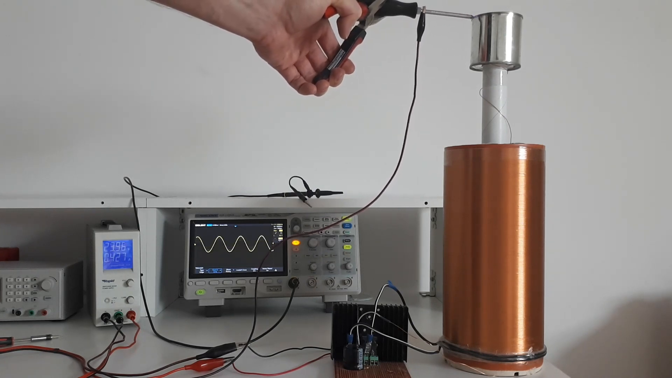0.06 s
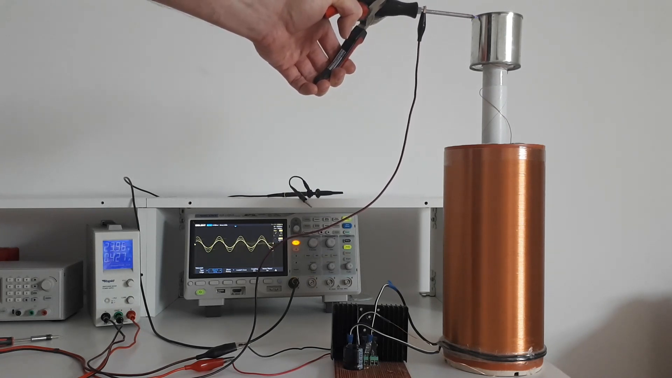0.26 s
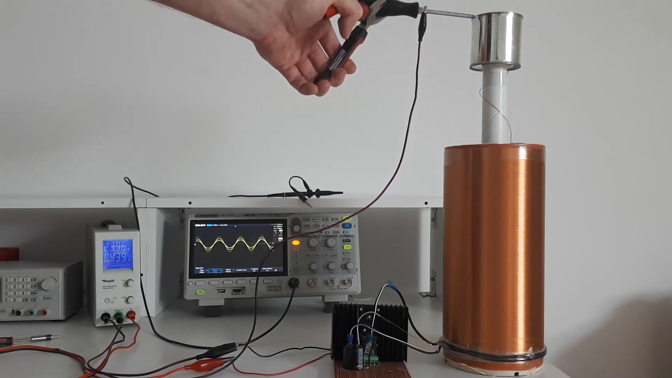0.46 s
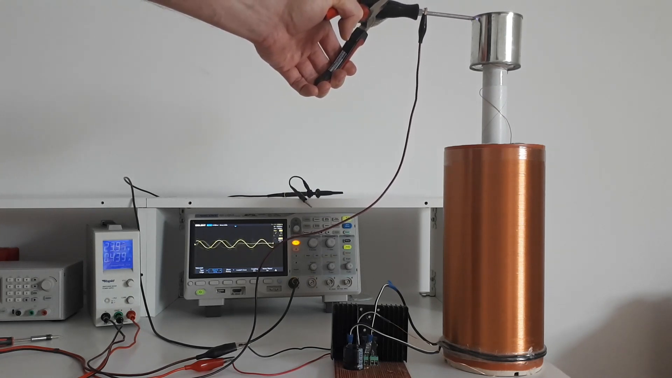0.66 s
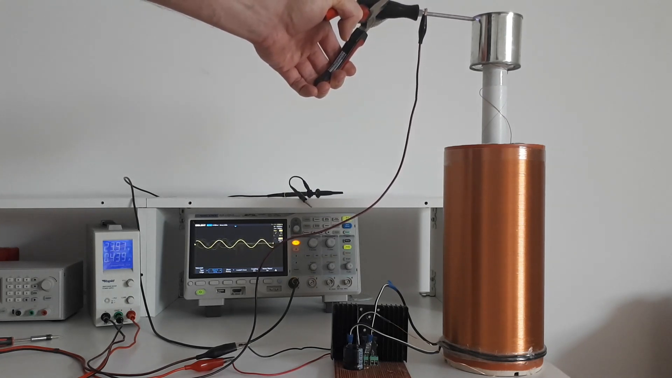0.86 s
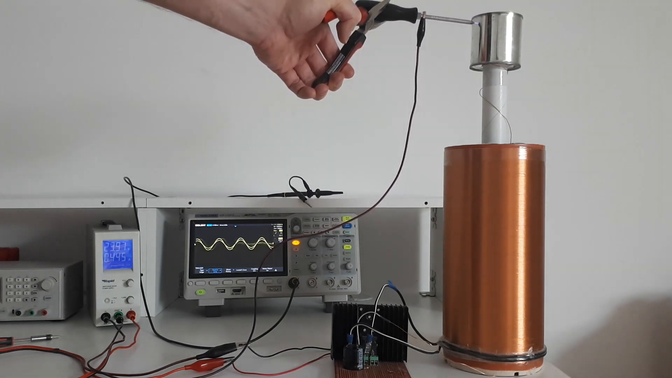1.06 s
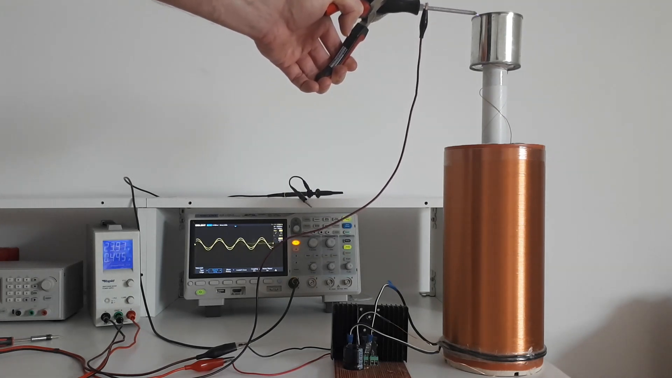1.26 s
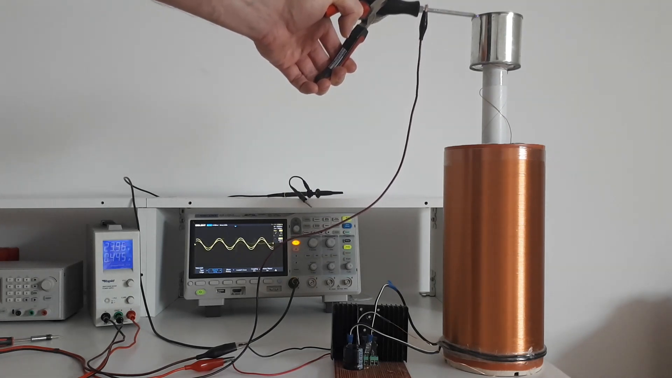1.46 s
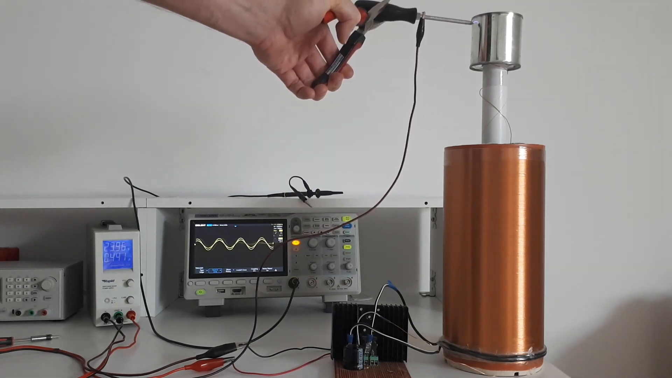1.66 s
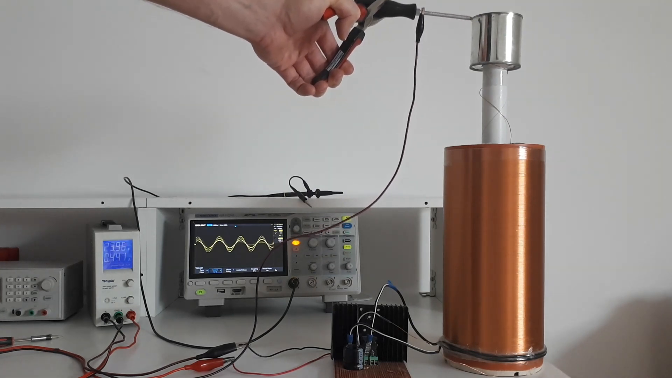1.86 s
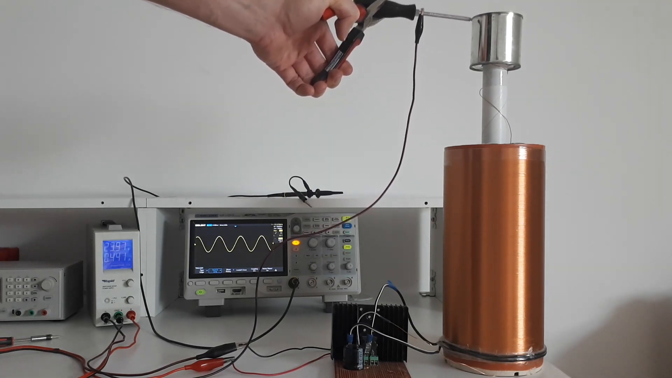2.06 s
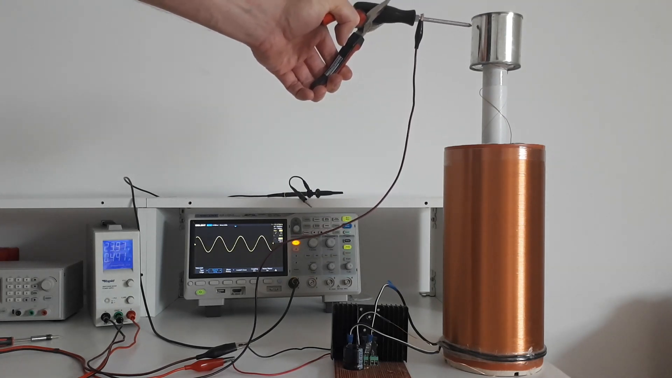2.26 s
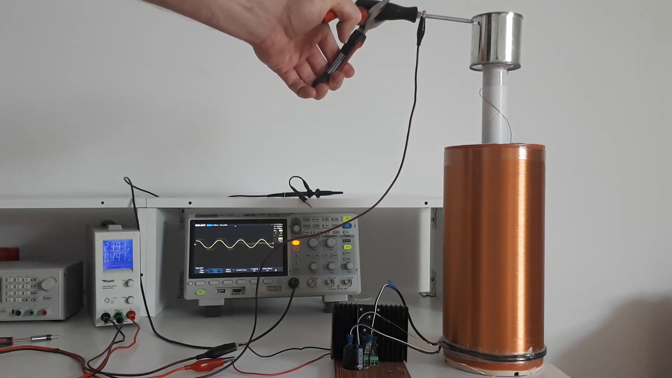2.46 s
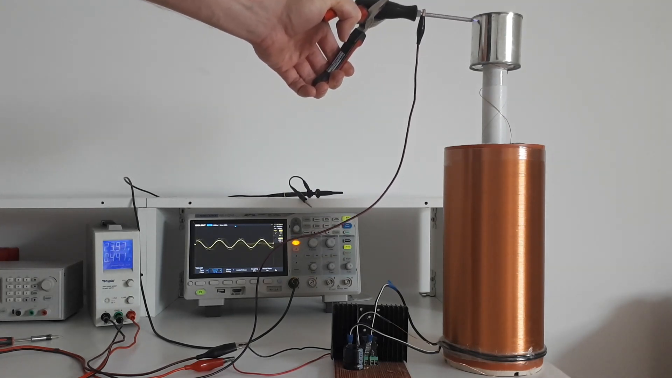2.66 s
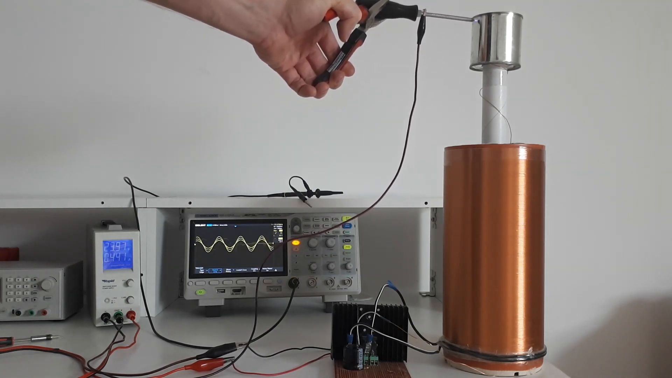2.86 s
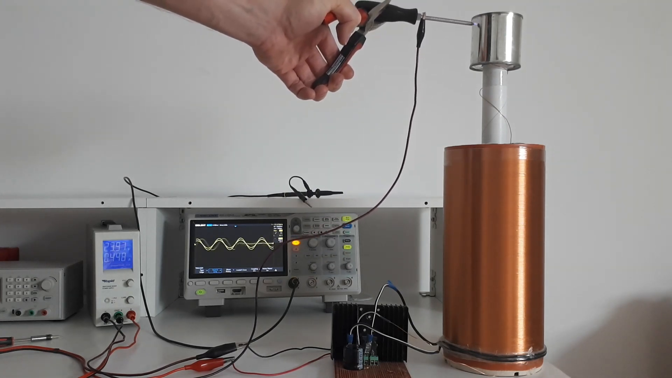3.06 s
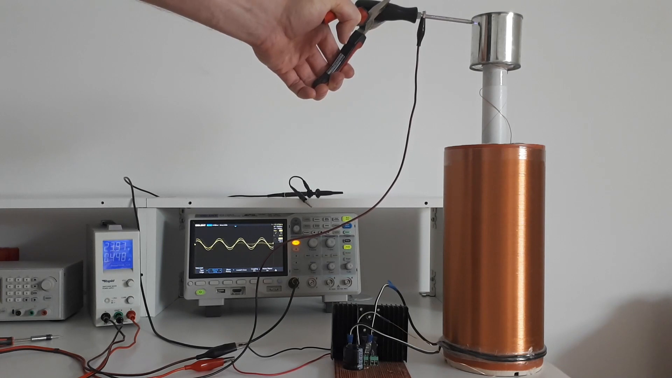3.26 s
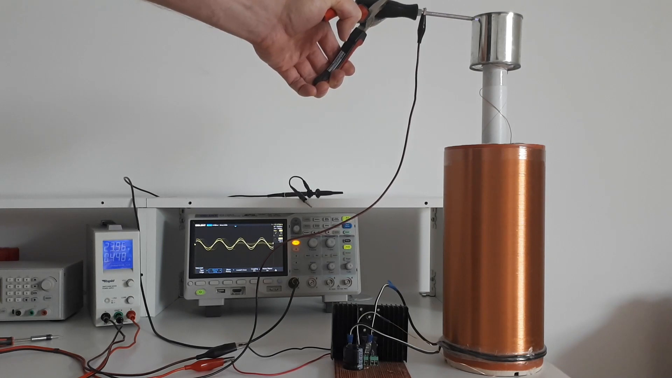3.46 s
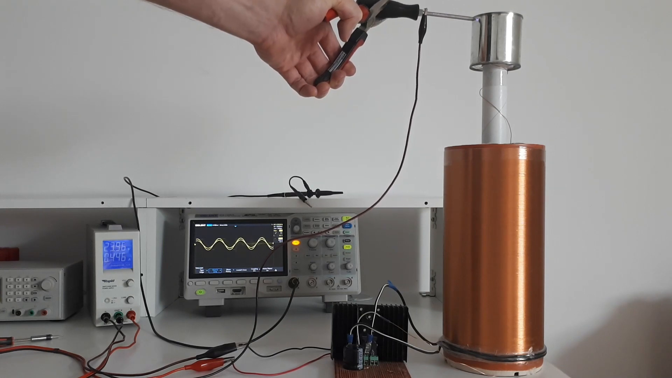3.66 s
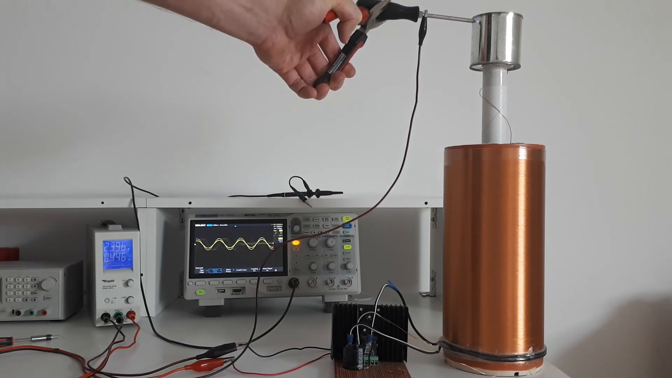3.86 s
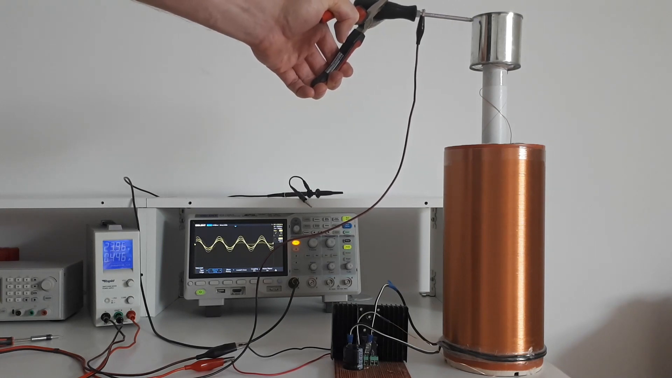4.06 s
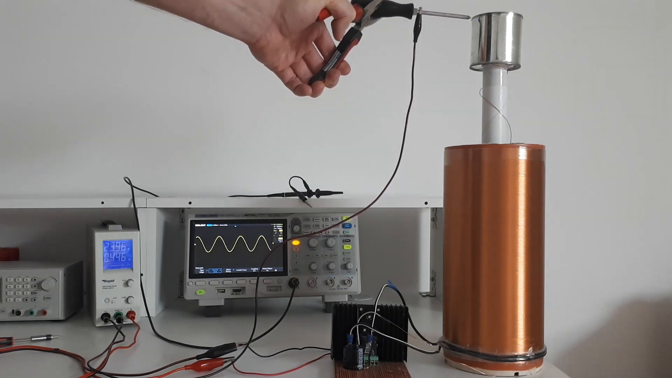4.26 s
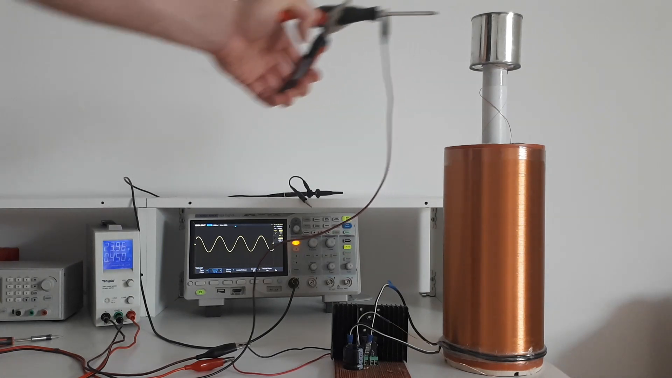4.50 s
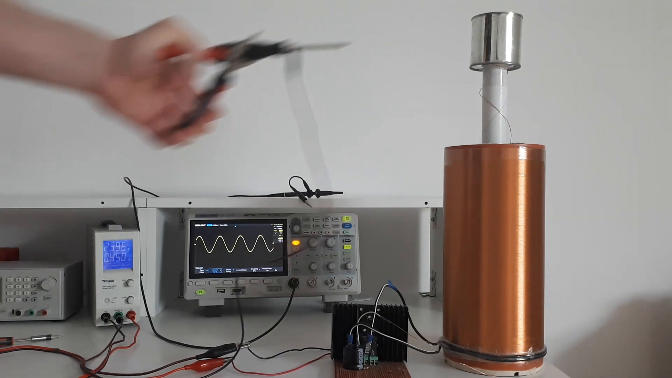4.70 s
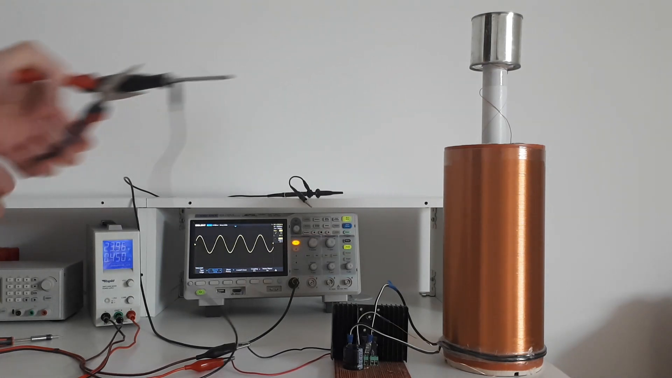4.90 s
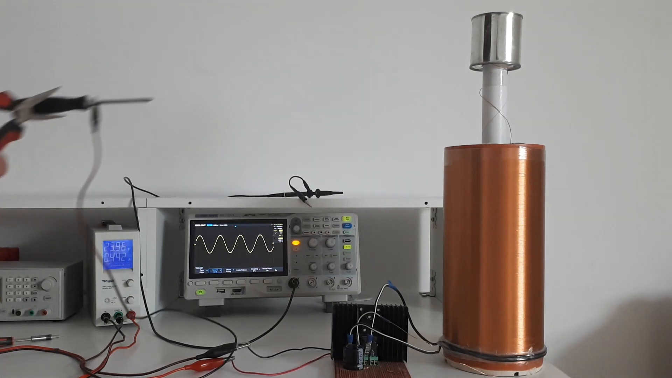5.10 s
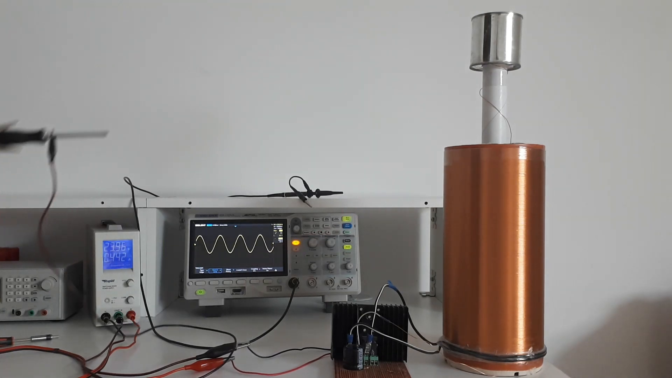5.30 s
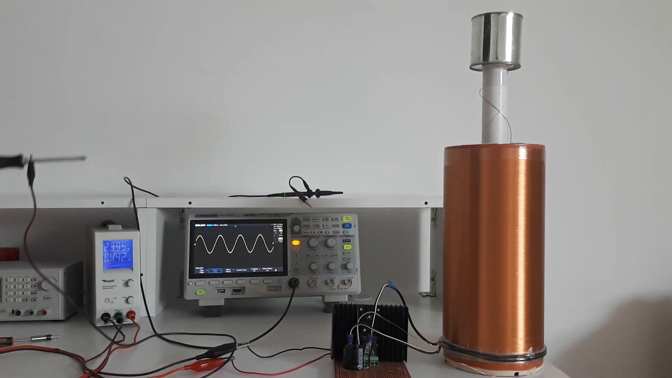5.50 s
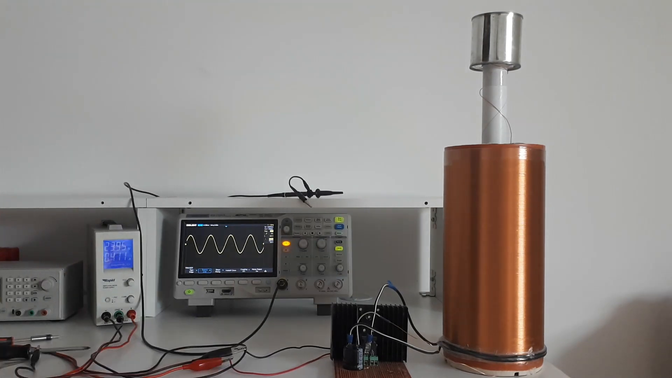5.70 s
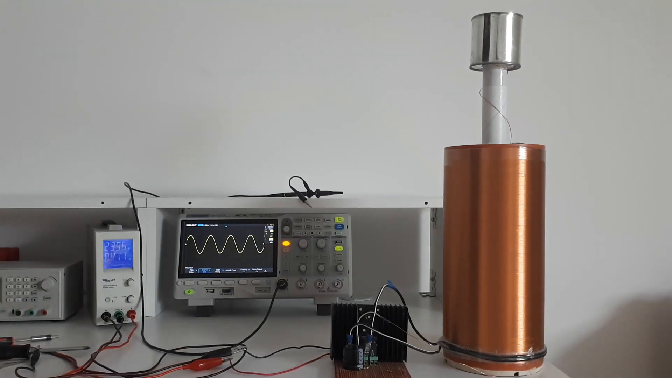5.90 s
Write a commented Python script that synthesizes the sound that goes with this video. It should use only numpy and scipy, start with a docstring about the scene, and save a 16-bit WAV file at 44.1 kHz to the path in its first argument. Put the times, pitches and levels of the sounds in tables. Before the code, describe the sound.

Harsh, high-pitched electric sizzling from a small coil bursts on and off twice over a faint fan hum in a bare room.

```python
"""Sizzling sparks from a small coil

A hand holds a grounded screwdriver near the metal top of a small high-voltage coil in a bare room.
Thousands of random kicks a second merge into a sizzle: a faint hiss, a stray spark, then two long arcs.
Fatter single sparks snap through it; echoes and decaying noise make the room around them.
Fan tones and shaped noise hum on the bench, low drones come and go, a narrow supply hiss sits on the left.
The ground lead ticks, with short fading sines, as it is pulled away."""
import sys
import numpy as np
from scipy import signal
from scipy.fft import rfft, irfft, next_fast_len
from scipy.io import wavfile
from scipy.ndimage import uniform_filter1d, map_coordinates

SR = 44100
rng = np.random.default_rng(int(sys.argv[2]) if len(sys.argv) > 2 else 0)


def log_audio(samples):
    """Write samples as a 16-bit WAV file to the path given in sys.argv[1]."""
    # one column per channel
    frames = np.atleast_2d(samples).T
    # limit to full scale, then quantise
    limited = np.clip(frames, -1, 1)
    pcm = np.round(limited * 32767).astype(np.int16)
    wavfile.write(sys.argv[1], SR, pcm)


N = 261954
TIME = np.arange(N) / SR  # seconds
LEFT_RIGHT = np.array([[1], [-1]])  # opposite signs for the two channels


def amp(db):
    """Decibels to gain."""
    return 10 ** (np.asarray(db) / 20)


def unit(x):
    """Scaled to rms 1."""
    return x / np.sqrt(np.mean(x ** 2) + 1e-20)


def along(points, hz):
    """Values read between (Hz, value) points on a log frequency axis."""
    f, v = np.transpose(points)
    return np.interp(np.log(hz + 1), np.log(f + 1), v)


def wobble(rate):
    """A smooth random curve around zero, with rate knots a second."""
    knots = rng.standard_normal(int(N * rate / SR) + 4)
    return map_coordinates(knots, [np.arange(N) * rate / SR])


def filtered(x, response):
    """x with its spectrum multiplied by a response that depends on frequency."""
    size = next_fast_len(N + SR // 2)
    spectrum = rfft(x, size) * response(np.fft.rfftfreq(size, 1 / SR))
    return irfft(spectrum, size)[..., :N]


def sides(db):
    """Left and right gains for a left minus right level difference."""
    return amp(np.array([db / 2, -db / 2]))


def phase(hz, waver):
    """The running phase of a tone whose pitch drifts randomly by about waver Hz."""
    return 2 * np.pi * (np.cumsum(hz + waver * wobble(8)) / SR + rng.random())


def thinned(start_s=5.65, fade_s=0.064):
    """0 before the hum turns thinner and brighter, 1 after."""
    return np.clip((TIME - start_s) / fade_s, 0, 1)


def drones(throb_hz=159, lift_db=2.5):
    """Soft low sines of unsteady pitch and level, the same left and right."""
    # low drones that come and go, perhaps from outside: start_s, pitch_hz, level_db (before the lift)
    drone_rows = [
        [(0, 100.8, -70), (.4, 108.1, -71), (.9, 120.5, -75), (1.5, 135, -71), (1.7, 135.8, -89)],
        [(3.6, 86.3, -98), (3.8, 87.4, -81), (4.9, 90, -75.5), (5.4, 90, -92)],
    ]
    # a wavering low tone: start_s, level_db (before the lift)
    throb_rows = [(0.0, -88), (0.06, -72), (0.2, -90), (0.61, -75), (0.76, -78), (1.04, -70), (2.68, -80.5),
                  (3.34, -70.5), (3.39, -82), (4.66, -69), (4.71, -81.5), (5.44, -66.5), (5.54, -78),
                  (5.94, -84.5)]
    out = np.zeros(N)
    for rows in drone_rows + [[(s, throb_hz, db) for s, db in throb_rows]]:
        s, hz, db = np.transpose(rows)
        level_db = np.interp(TIME, s, db, left=-120, right=-120) + lift_db + 1.9 * wobble(3.0)
        pitch_hz = np.interp(TIME, s, hz)
        out += amp(level_db) * np.sin(phase(pitch_hz, waver=1.56))
    return out


def supply_hiss(db=-81, centre_hz=7500, width_hz=420, pan_db=16):
    """The supply's narrow band of noise, stronger on the left."""
    noise = rng.standard_normal(N)
    band = filtered(noise, lambda hz: np.exp(-((hz - centre_hz) / width_hz) ** 2))
    return amp(db) * sides(pan_db)[:, None] * unit(band)


def fan_air(db=-58):
    """Moving air as shaped noise, more alike left and right in the bass, unrelated in the treble."""
    # colour of fan air and microphone hiss: pitch_hz, relative level_db (per Hz)
    air_colour = [(15, -62), (45, -23), (90, -17), (200, -18), (370, -5.5), (480, -10), (620, -21.5),
                  (950, -21.5), (1300, -33.5), (1700, -27), (2000, -36), (5000, -42.5), (16500, -44)]
    # side balance: pitch_hz, left_minus_right_db
    air_pan = [(150, 1), (300, 4.5), (650, 5.5), (1000, 0), (1600, 4), (2200, 1), (16000, 1)]
    # how alike the sides are: pitch_hz, likeness (0 to 1)
    air_alike = [(40, .62), (150, .6), (300, .75), (800, .68), (1200, .05), (3000, 0)]

    def mid_and_side(hz):
        turn = np.arccos(np.clip(along(air_alike, hz), -1, 1)) / 2
        return amp(along(air_colour, hz)) * [np.cos(turn), np.sin(turn)]

    mid, side = filtered(rng.standard_normal((2, N)), mid_and_side)
    stereo = unit(np.array([mid + side, mid - side]))
    return amp(db) * filtered(stereo, lambda hz: sides(along(air_pan, hz)))


def faint_tones(lift_db=2.5):
    """Blurred fan and supply tones: sines that flicker in level and pitch, a little apart left and right."""
    # fainter tones: pitch_hz, level_db (before the lift), left_minus_right_db
    weak_tones = [(198.4, -76.5, 1), (390, -92, 7), (472, -78, -1), (540, -78.5, 5), (710, -78.5, 6.5),
                  (816, -80.5, -11.5), (995, -86.5, 5), (990, -81.5, -7), (1222, -89.5, 9), (1453, -94, 2)]
    out = np.zeros((2, N))
    for hz, db, pan_db in weak_tones:
        apart = 0.74 * wobble(5) * LEFT_RIGHT  # radians
        level = amp(db + lift_db + 3.3 * wobble(14))
        out += level * sides(pan_db)[:, None] * np.sin(phase(hz, waver=5.04) + apart)
    return out


def swelling(hum):
    """Slow swells: the rumble under 230 Hz and the band from 550 to 1100 Hz rise and fall."""
    # start_s, rumble_change_db, middle_change_db
    swell_rows = [(0, -1, -3), (.5, 1.5, 2.5), (1.25, 1.5, -1), (2, 0, -1), (3.5, .8, -1.5), (4, -.5, 0),
                  (4.5, -.5, -2), (5.94, -1, -2.5)]
    s, *changes = np.transpose(swell_rows)
    for (low_hz, high_hz), db in zip([(0, 230), (550, 1100)], changes):
        band = filtered(hum, lambda hz: (hz > low_hz) & (hz < high_hz))
        hum = hum + (amp(np.interp(TIME, s, db)) - 1) * band
    return hum


def thinning(hum):
    """The hum crossfades to a thinner, brighter colour near the end."""
    # pitch_hz, change_db
    thin_colour = [(60, 4), (160, -4), (330, -7), (600, 2.5), (1000, 4.5), (1700, 6.5), (2500, 0.5)]
    thin_hum = filtered(hum, lambda hz: amp(along(thin_colour, hz)))
    return (1 - thinned()) * hum + thinned() * thin_hum


def fan_tones(shaft_hz=50.9, flicker_db=1.17):
    """Blade and motor tones at whole multiples of the shaft speed, each flickering on its own."""
    # place of each tone: shaft_order (multiple), left_minus_right_db, left_lead_rad
    tone_place = [(6, 5, -.1), (7, 6, .6), (32, 10, -1.9)]
    # 6th and 7th order: level_db (relative to the hum), change_db (once the hum thins)
    tone_db = [(0, -16), (0, -6.5)]
    # shared rise and fall of the 6th and 7th order: start_s, level_db
    hum_rows = [(0.0, -58.5), (1.37, -56.5), (1.56, -63), (1.79, -53.5), (1.95, -60), (2.53, -56.5),
                (4.52, -58), (4.66, -54.5), (4.7, -58), (5.22, -61), (5.36, -59), (5.6, -59.5)]
    # the 32nd order on its own: start_s, level_db (before a 5.5 dB lift)
    whine_rows = [(0.0, -78.5), (0.38, -71), (1.34, -80.5), (1.39, -72), (1.5, -80), (1.67, -70.5),
                  (2.31, -83), (2.89, -75.5), (3.04, -89), (3.56, -71), (4.5, -81), (4.75, -73),
                  (4.88, -82.5), (5.46, -83.5), (5.74, -66), (5.94, -67)]
    hum_db = np.interp(TIME, *np.transpose(hum_rows))
    whine_db = np.interp(TIME, *np.transpose(whine_rows))
    levels = [hum_db + db + change_db * thinned() for db, change_db in tone_db]
    levels.append(whine_db + 5.5)
    out = np.zeros((2, N))
    for (order, pan_db, lead), db in zip(tone_place, levels):
        level = amp(db + 1.25 * wobble(14) + flicker_db * wobble(6))
        tone = np.sin(phase(order * shaft_hz, waver=1.21) + LEFT_RIGHT * lead / 2)
        out += level * sides(pan_db)[:, None] * tone
    return out


def ticks():
    """Dry clicks of the ground lead: short sines that fade by 60 dB in eight cycles."""
    # start_s, starting level_db, pitch_hz
    tick_rows = [(4.51, -55, 3000), (4.708, -46, 14040), (4.724, -52, 15000), (4.787, -54.5, 3600)]
    out, t = np.zeros(N + SR), np.arange(400) / SR
    for s, db, hz in tick_rows:
        start = round(s * SR)
        out[start:start + len(t)] += amp(db - 60 * t * hz / 8) * np.sin(2 * np.pi * hz * t)
    return out[:N]


def snaps():
    """Fat single sparks: one strong pressure kick each, deeper in colour than the sizzle."""
    # start_s, level_db (of the kick before colouring)
    snap_rows = [(0.3817, -18), (1.1955, -25), (1.611, -25), (1.7967, -27), (2.8493, -16), (3.579, -14),
                 (3.6084, -18)]
    # pitch_hz, gain_db
    snap_colour = [(300, -30), (700, -15), (1500, -4.5), (3000, 3), (8000, -2), (16000, -4)]
    out = np.zeros(N)
    for s, db in snap_rows:
        out[round(s * SR)] = -amp(db)
    return filtered(out, lambda hz: amp(along(snap_colour, hz)))


def spark_kicks(rate=9000, spread_db=4):
    """Tiny sparks: random pressure kicks of uneven size, rate a second on average, mostly downward."""
    present = rng.random(N) < rate / SR
    sizes = amp(spread_db * rng.standard_normal(N))
    kicks = present * sizes * np.sign(rng.random(N) - .7)
    return unit(kicks - kicks.mean())


def metal_top(x):
    """The coil's metal top rings: narrow resonances added to the sound that strikes it."""
    # pitch_hz, width_hz, level_db (gain at the centre)
    rings = [(6100, 26, -20), (6600, 30, -38), (7635, 58, 2.5), (10200, 73, 2.5), (11150, 36, 3.5),
             (13500, 40, -5), (14600, 64, -12.5)]

    def response(f):
        return 1 + sum(amp(db) * 1j * f * w / (c * c - f * f + 1j * f * w) for c, w, db in rings)
    return filtered(x, response)


def arcs(flutter_db=1, shimmer_db=1.2, lift_db=3):
    """Merged spark kicks; the wandering gap changes their level and how deep their colour reaches."""
    # the two long arcs: start_s, crackle_db (above 9 kHz, before the lift), then relative to the crackle:
    # depth_db (near 2 kHz), fizz_db (near 7 kHz), bite_db (near 5 kHz), rasp_db (near 3.5 kHz)
    long_arcs = [
        [(0.107, -40, -21, -5, -7, -17), (0.151, -41, -30, -8, -6, -14), (0.185, -44, -17.5, -10, -4, -10.5),
         (0.219, -39.5, -14.5, -7, -9.5, -13), (0.537, -41, -14.5, -7, -10, -13),
         (0.769, -44, -36, -10, -6.5, -15.5), (1.013, -37.5, -31.5, -5.5, -8.5, -16),
         (1.063, -37, -27, -9, -5, -13), (1.097, -44.5, -29, -8, -10, -18), (1.157, -37, -32.5, -3, -15, -22),
         (1.205, -41.5, -26, -4, -9, -13), (1.279, -39.5, -19.5, -6.5, -10, -9),
         (1.495, -41, -16.5, -6.5, -11, -10.5), (1.579, -40, -34, -5, -9, -20),
         (1.623, -36.5, -25, -9, -5.5, -16), (1.789, -38, -38, -0.5, -14.5, -19.5),
         (1.819, -45, -19, -4, -13, -13), (1.859, -37.5, -24, -3, -11, -21), (1.87, -44, -26, 2, -9, -20)],
        [(2.388, -41, -37, 0, -15, -17), (2.402, -44, -37, -4, -12, -21), (2.448, -38, -33.5, -5, -9.5, -22),
         (2.612, -38.5, -26.5, -7.5, -7, -18), (2.672, -38.5, -32.5, -7.5, -10, -16.5),
         (2.79, -41, -20, -6.5, -7, -16), (2.842, -39.5, -20, -8.5, -11.5, -11),
         (2.996, -40, -26, -6.5, -10, -10.5), (3.052, -37, -27.5, -11.5, -8, -15),
         (3.212, -39, -29, -5, -6, -17.5), (3.24, -35.5, -26, -6, -12, -19), (3.264, -44.5, -26, -6, -8, -17),
         (3.31, -38.5, -31, -5.5, -10, -21.5), (3.46, -39, -22.5, -5.5, -10, -15.5),
         (3.6, -38.5, -23, -8, -12.5, -9), (3.806, -40, -20.5, -8.5, -10.5, -10.5),
         (3.98, -39, -30, -7.5, -5.5, -20), (4.054, -39, -26, -3.5, -12.5, -26), (4.07, -39.5, -24, 2, -5, -16)],
    ]
    # a faint hiss, then a lone spark before the first arc: same columns as the long arcs
    stray = [(0, -57, -20, -3, -1, -9), (0.0197, -66, -20, -5, -7, -14), (0.02, -38, -19, -5, -7, -18),
             (0.025, -36, -19.5, -8.5, -10, -15.5), (0.03, -38.5, -21, -9, -9, -16)]
    # average spark colour: pitch_hz, level_db (per Hz)
    spark_colour = [(600, -30), (1500, -21.5), (2500, -9), (4000, -3), (7500, 2.5), (8600, -5.5),
                    (10500, -3), (13000, 1.5), (16500, 2)]
    # bands moved by depth, fizz, bite and rasp: pitch_hz, share (of the control)
    reaches = [
        [(1200, 0.6), (2200, 1.2), (3500, 0.0063)],
        [(5200, 0.015), (7000, 1), (8200, 0.46), (10000, -0.24)],
        [(3500, 0), (5100, 1), (7000, 0)],
        [(2200, 0), (3500, 1), (5100, 0.048)],
    ]
    # an average arc's controls: depth_db, fizz_db, bite_db, rasp_db
    usual = [-20, -6, -9, -13]
    all_arcs = [stray] + long_arcs
    s, crackle_db, *bands = np.vstack(all_arcs).T
    hz, t, z = signal.stft(spark_kicks(), SR, nperseg=256)

    # smooth random patches over pitch and time make the colour shimmer
    patches = uniform_filter1d(rng.standard_normal(z.shape), size=9, axis=0)
    patches = uniform_filter1d(patches, size=14, axis=1)
    colour = along(spark_colour, hz)[:, None] + shimmer_db * unit(patches)
    for reach, db, usual_db in zip(reaches, bands, usual):
        colour = colour + np.outer(along(reach, hz), np.interp(t, s, db - usual_db))
    sizzle = signal.istft(z * amp(colour), SR, nperseg=256)[1][:N]

    # an arc strikes and breaks at once
    lit = sum((TIME >= arc[0][0]) & (TIME < arc[-1][0]) for arc in all_arcs)
    level_db = np.interp(TIME, s, crackle_db) + lift_db + flutter_db * wobble(40)
    return metal_top(lit * amp(level_db) * sizzle)


def straight(x, lag_s=7.3e-5):
    """The direct path, reaching the right side first by lag_s, and the first echoes."""
    # colour of the straight path relative to the room sound: pitch_hz, level_db
    near_colour = [(1000, -4), (5000, -1.5), (9000, -6), (12000, -1), (16000, -2)]
    # echoes off coil, shelf and wall: delay_s, left_db, right_db (relative to the direct path)
    echo_rows = [(.0011, -6, -7.5), (.0024, -12.5, -11), (.0047, 0.5, -16.5)]

    def path(hz):
        echoes = sum(amp([[left], [right]]) * np.exp(-2j * np.pi * hz * s) for s, left, right in echo_rows)
        # left is delayed and right advanced, each by half the lag
        lag = np.exp(-2j * np.pi * hz * lag_s / 2 * LEFT_RIGHT)
        return amp(along(near_colour, hz)) * lag * (1 + echoes)
    return filtered(x, path)


def room(x):
    """Bare walls: each frequency dies at its own speed; the random echo pattern is redrawn every 1/3 s."""
    # pitch_hz, t60_s (time to fall by 60 dB)
    decay = [(1000, 0.19), (3000, 0.37), (5000, 0.37), (8000, 0.38), (16000, 0.26)]
    out, step = np.zeros((2, N + SR)), SR // 3
    for start in range(0, N, step):
        hz, t, z = signal.stft(rng.standard_normal((2, SR // 2)), SR, nperseg=256)
        fading = z * amp(-60 * t / along(decay, hz)[:, None])
        tail = signal.istft(fading, SR, nperseg=256)[1][:, :SR // 2]
        tail = tail / np.linalg.norm(tail[0])
        wet = signal.fftconvolve(x[None, start:start + step], tail, axes=1)
        late = start + 200  # the tail starts 200 samples after the dry sound
        out[:, late:late + wet.shape[1]] += wet
    return out[:, :N]


def scene():
    """Sparks and ticks in the room over the bench hum."""
    # side balance of the sparks: pitch_hz, left_minus_right_db
    spark_pan = [(1000, 2.5), (4000, 0), (7600, 3.5), (10000, 0.5), (16000, -1)]
    hum = thinning(swelling(fan_air() + faint_tones()))
    background = drones() + supply_hiss() + hum + fan_tones()
    sparks = ticks() + snaps() + arcs()
    in_room = straight(sparks) + amp(0.5) * room(sparks)
    return background + filtered(in_room, lambda hz: sides(along(spark_pan, hz)))


def record(dry, top_hz=15750):
    """A steep treble limit: almost nothing passes above top_hz."""
    return filtered(dry, lambda hz: 1 / (1 + np.exp(np.clip((hz - top_hz) / 12, -50, 50))))


dry = scene()
out = record(dry)
log_audio(out)
```